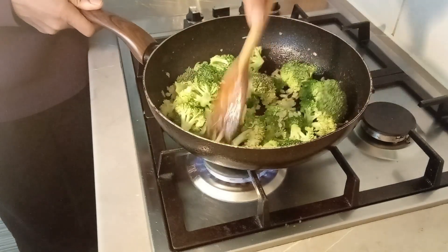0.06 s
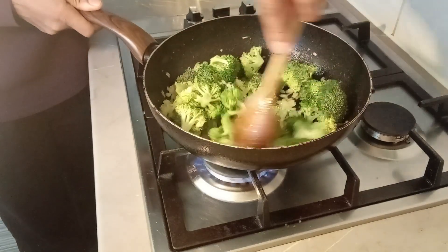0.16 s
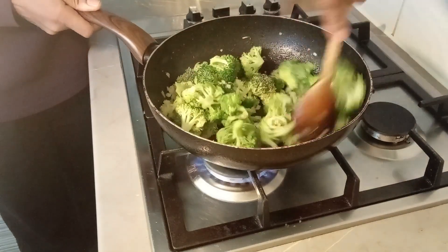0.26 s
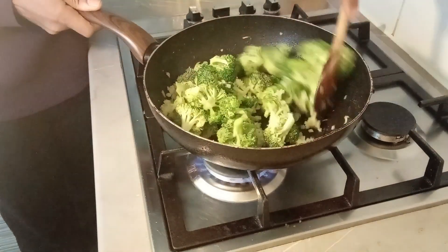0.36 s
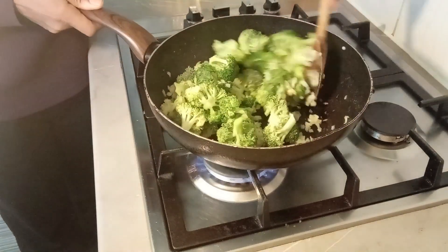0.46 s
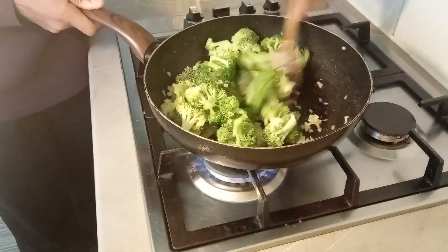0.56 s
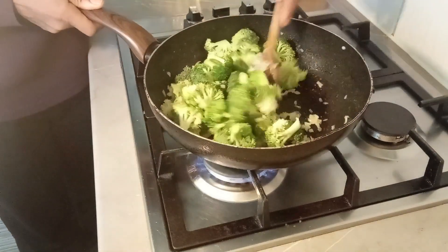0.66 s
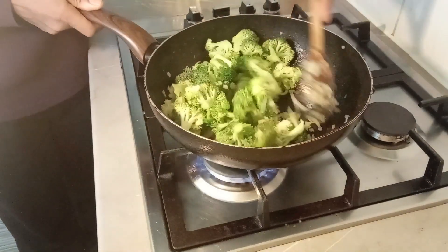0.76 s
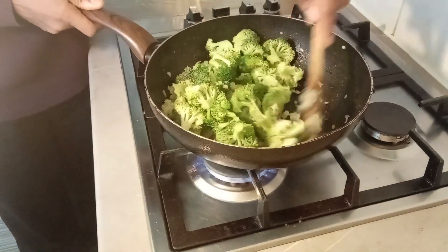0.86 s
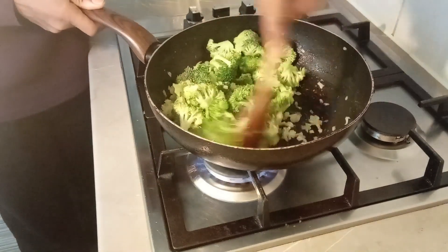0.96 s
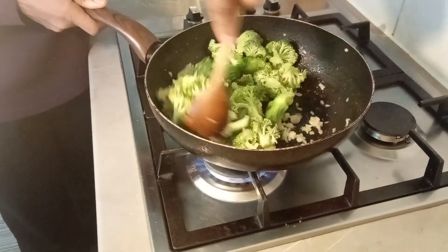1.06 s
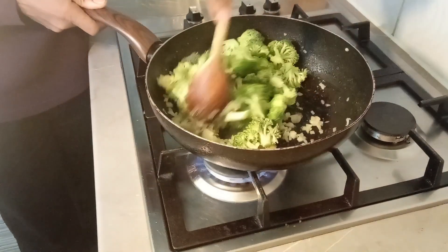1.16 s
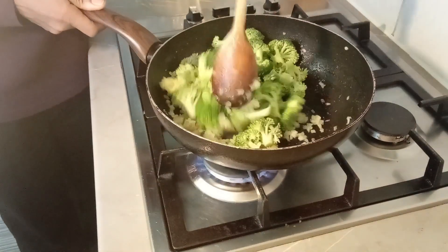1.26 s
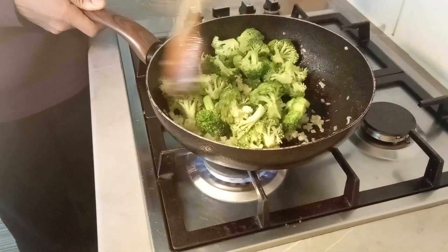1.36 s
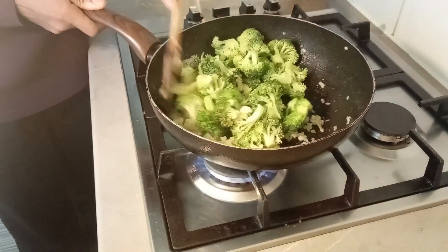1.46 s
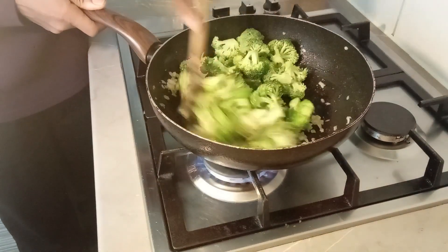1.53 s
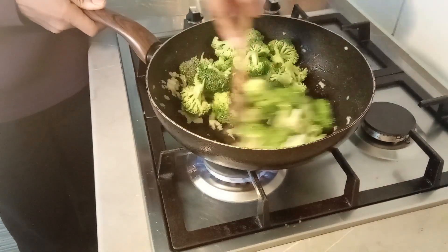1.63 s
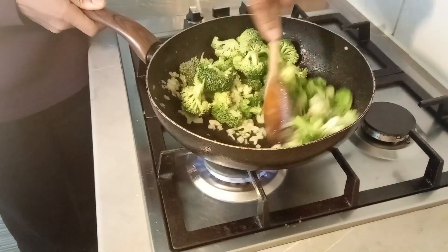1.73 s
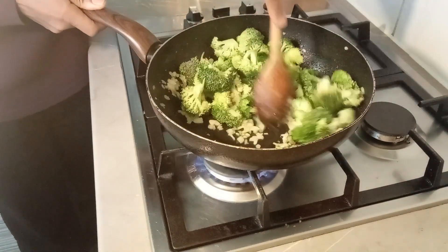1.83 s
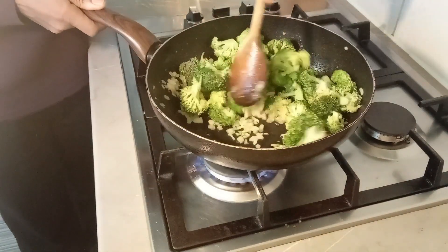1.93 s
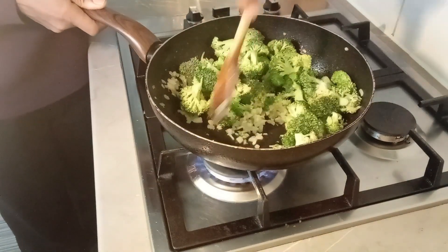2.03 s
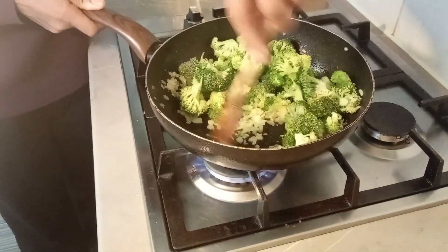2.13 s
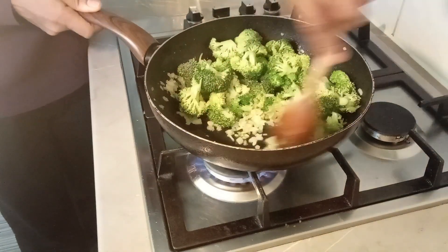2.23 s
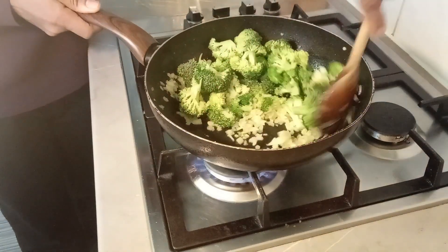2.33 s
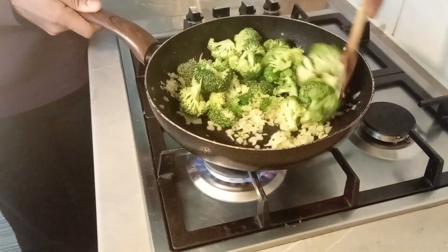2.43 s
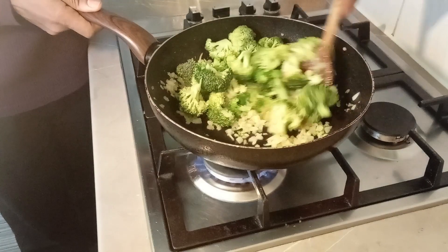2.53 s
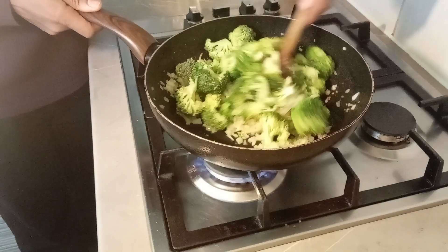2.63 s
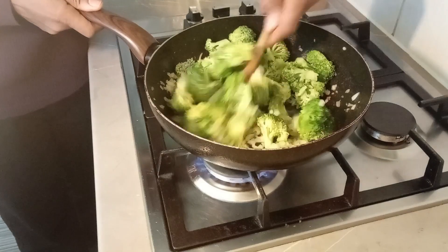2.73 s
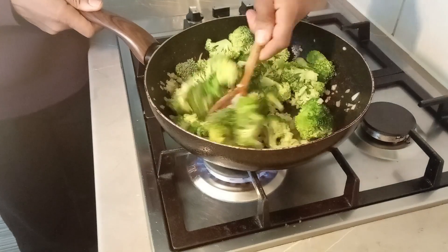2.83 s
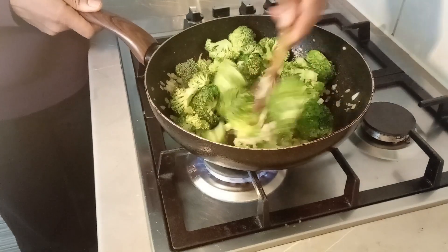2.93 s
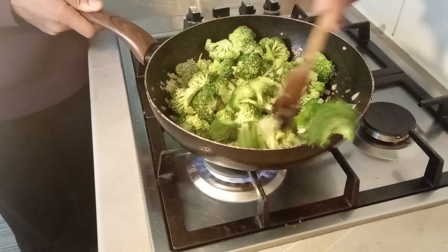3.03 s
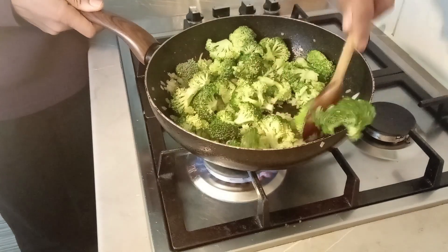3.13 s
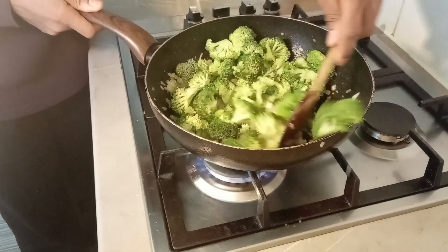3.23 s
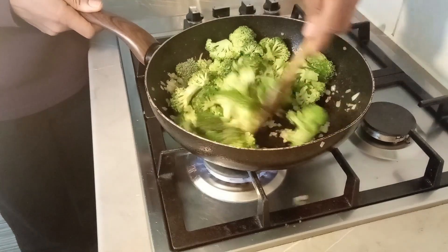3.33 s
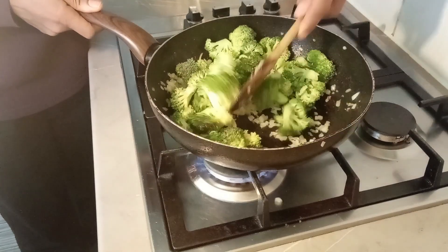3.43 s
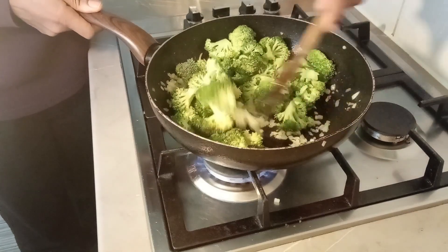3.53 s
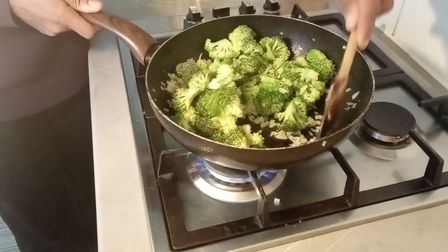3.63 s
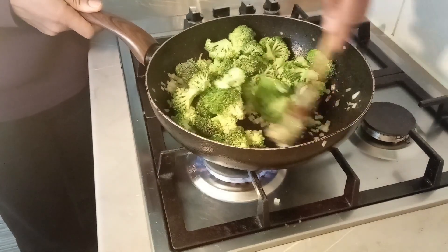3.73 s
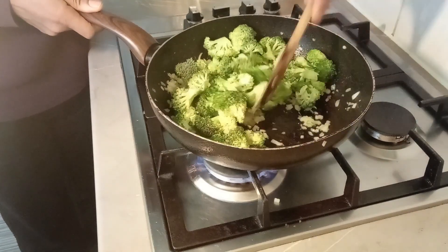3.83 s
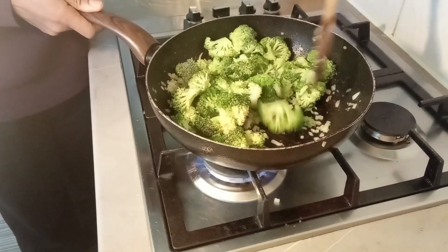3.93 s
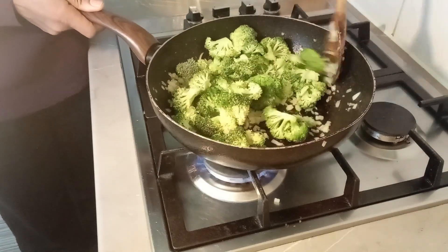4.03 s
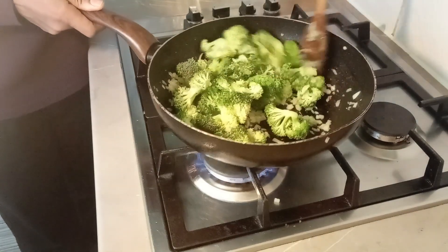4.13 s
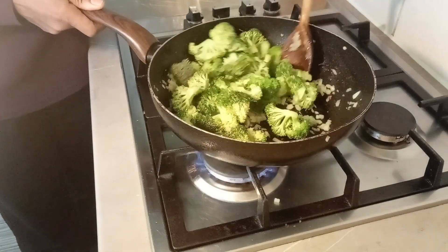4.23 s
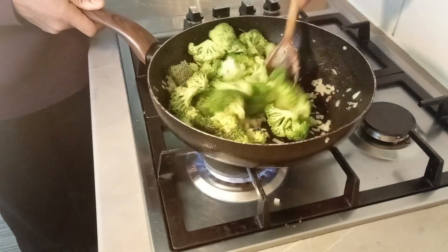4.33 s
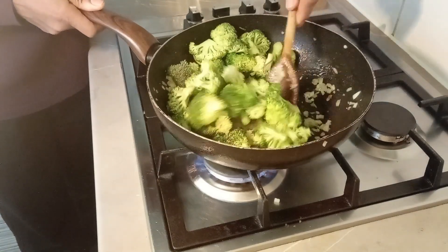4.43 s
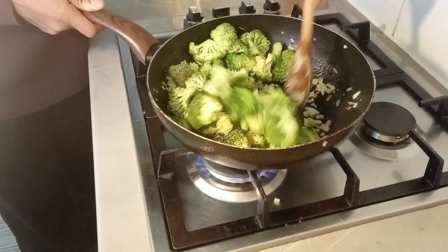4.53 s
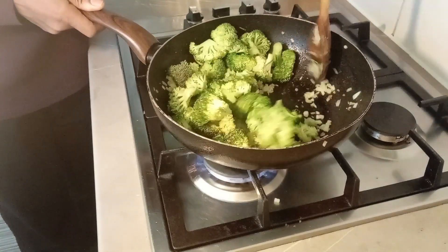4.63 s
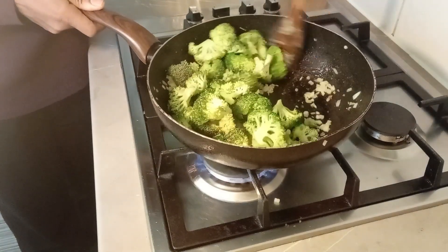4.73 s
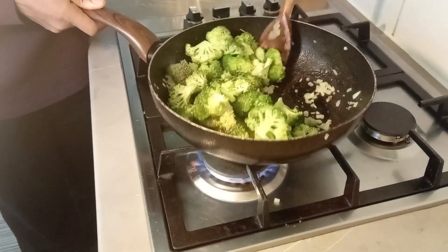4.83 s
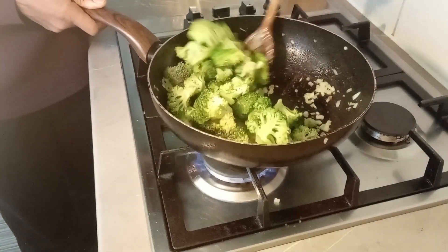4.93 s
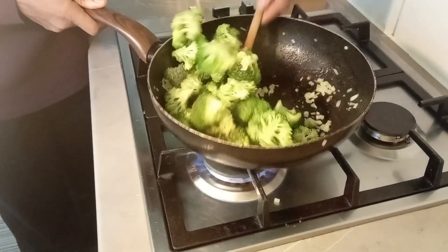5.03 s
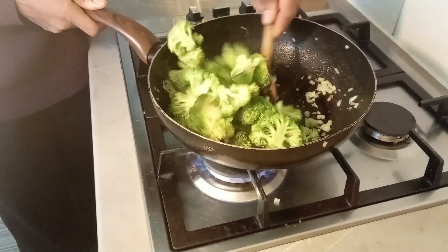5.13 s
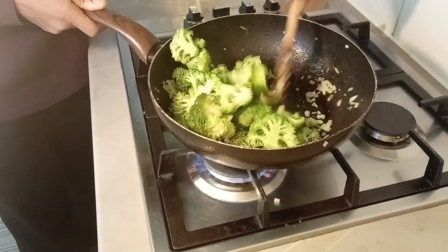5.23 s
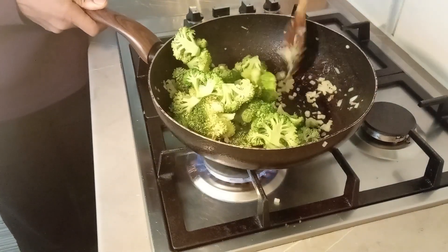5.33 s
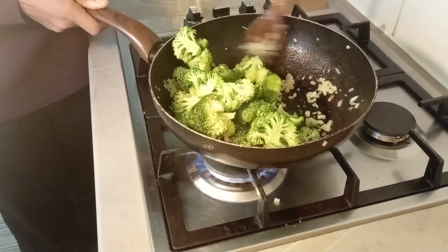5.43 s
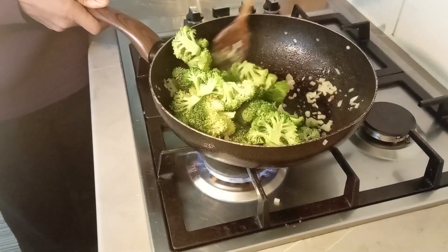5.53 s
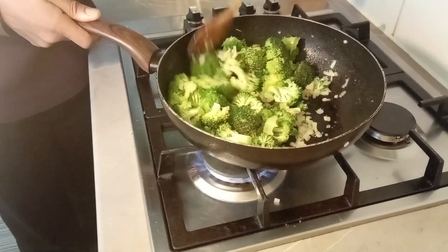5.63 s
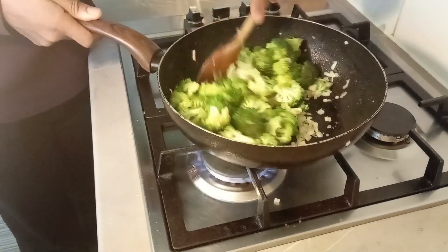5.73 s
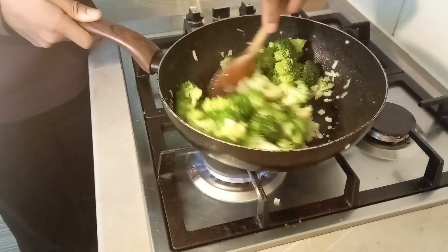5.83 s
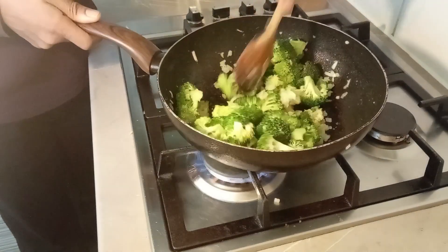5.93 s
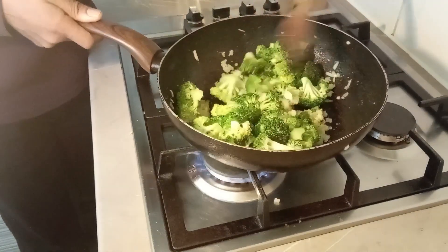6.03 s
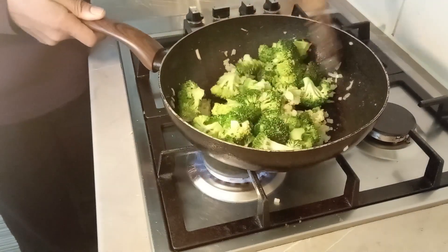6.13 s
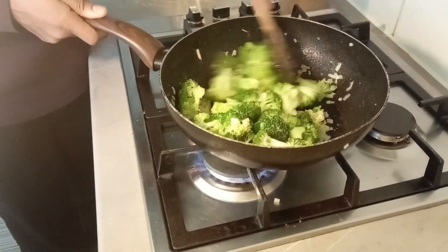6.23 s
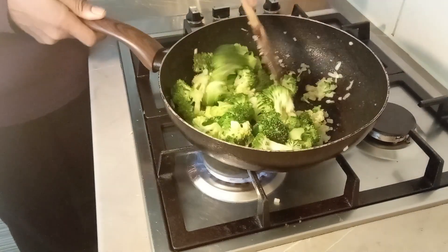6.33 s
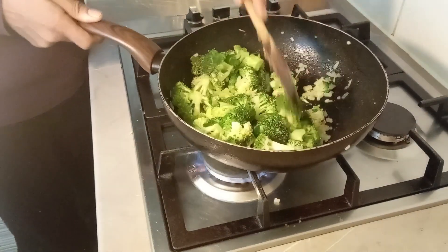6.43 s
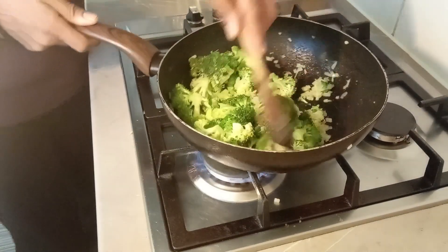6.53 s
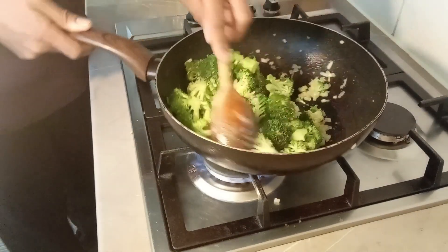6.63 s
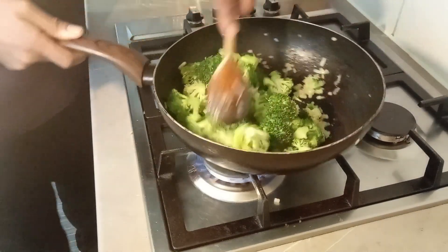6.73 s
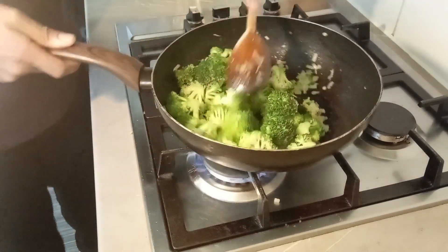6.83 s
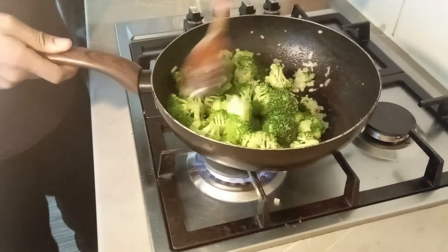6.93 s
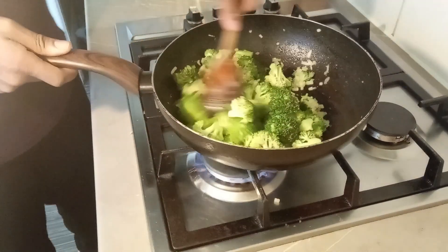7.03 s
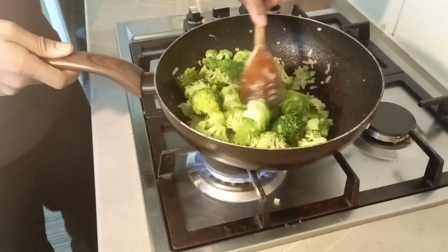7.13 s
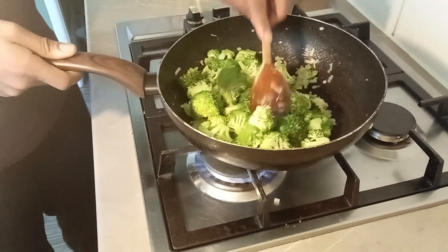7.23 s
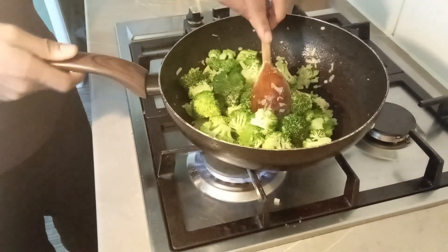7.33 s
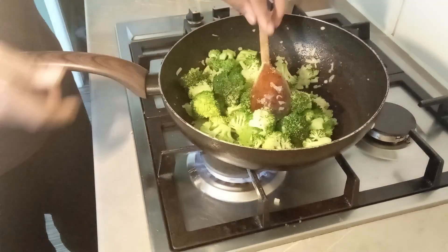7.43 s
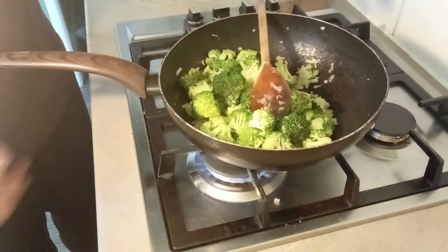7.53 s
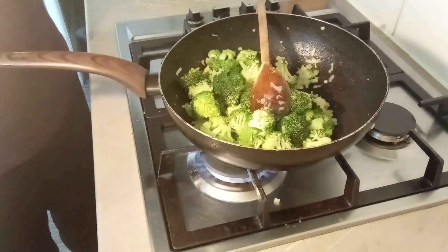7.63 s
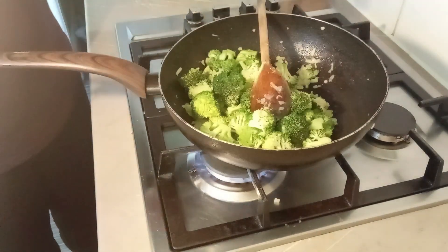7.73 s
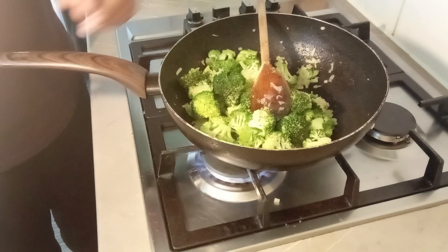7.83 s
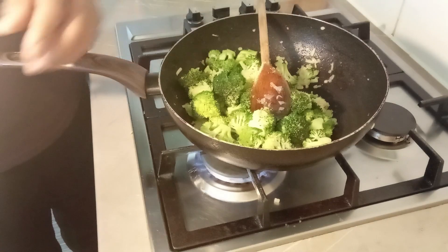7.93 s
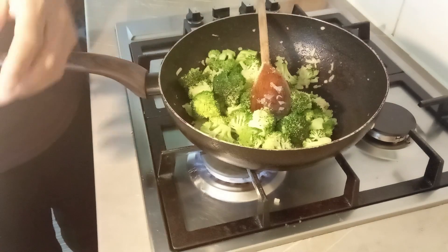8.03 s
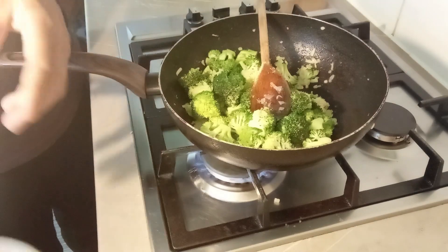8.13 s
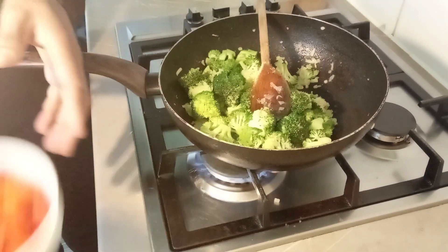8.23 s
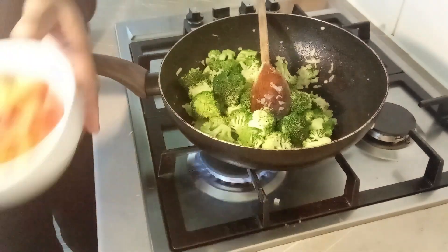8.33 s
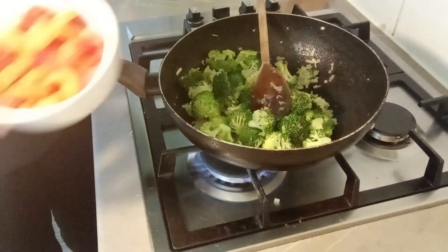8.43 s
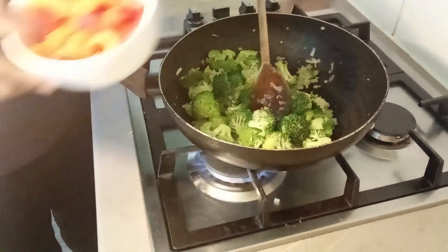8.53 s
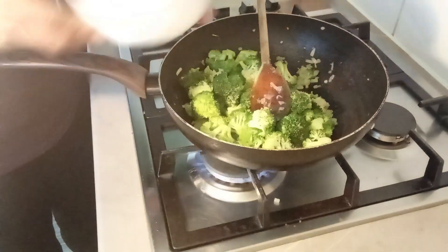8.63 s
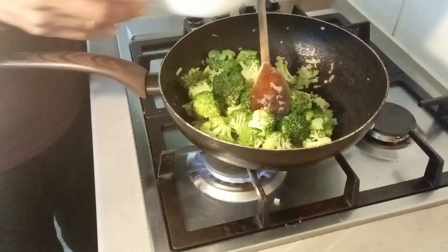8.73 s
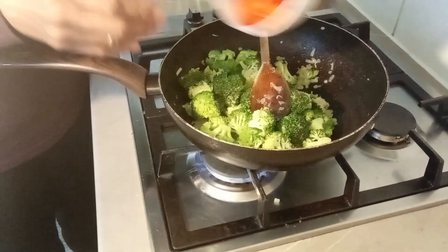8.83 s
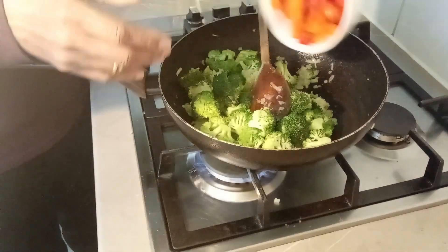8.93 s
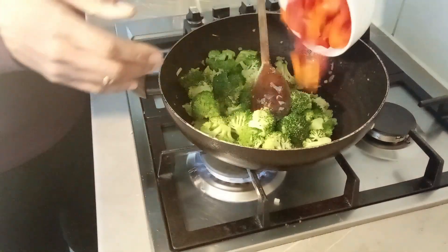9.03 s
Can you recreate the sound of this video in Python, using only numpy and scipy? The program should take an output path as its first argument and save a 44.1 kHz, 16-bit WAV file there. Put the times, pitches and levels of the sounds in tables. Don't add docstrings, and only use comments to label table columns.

```python
import sys
import numpy as np
from scipy import signal
from scipy.fft import rfft, irfft, next_fast_len
from scipy.io import wavfile
from scipy.ndimage import uniform_filter1d

SR = 44100
rng = np.random.default_rng(int(sys.argv[2]) if len(sys.argv) > 2 else 0)


def transcribe(signal):
    frames = np.atleast_2d(signal).T
    limited = np.clip(frames, -1, 1)
    pcm = np.round(limited * 32767).astype(np.int16)
    wavfile.write(sys.argv[1], SR, pcm)


def level_to_linear(level):
    exponent = np.asarray(level, float) / 20
    return 10 ** exponent


N = 400428

# (frequency [Hz], density [dB per Hz])
AIR_SPECTRUM = [(140, -45), (240, -13), (414, -3.5), (475, -10), (1060, -2.5), (1140, 1), (1340, -13),
                (1500, -12), (1950, -1), (3300, -120)]
AIR_DB = -55.5
KITCHEN_T60_S, WALL_CUT_HZ = 0.2, 6300

# (frequency [Hz], density [dB per Hz])
ROAR_SPECTRUM = [(15, -73), (25, -35.5), (65, -41), (82, 1), (101, -5), (115, -7), (130, -25), (183, -20),
                 (260, -37), (340, -67), (570, -120)]
DRONE_HZ, DRONE_WIDTH_HZ, ROAR_DB = 103.1, 9.1, -67
DRONE_DB, DRONE_WAVER_DB = -45, -0.5
DRONE_SHAKEN_DB, SHAKE_S = -9.5, 0.2
DRONE_LEFT_DB = -2

# (time [s], pitch [Hz], level [dB])
SQUEAK = [
    (2.945, 650, -58),
    (2.96, 527, -42),
    (2.985, 476, -45),
    (3.005, 520, -50),
    (3.02, 600, -45),
]

# (peak time [s], half length [s], pitch [Hz], level [dB])
RUBS = [
    (0.026, 0.048, 643, -40.5),
    (0.597, .03, 600, -40.5),
    (1.888, 0.048, 670, -51),
    (3.356, 0.034, 600, -33.5),
    (5.65, .04, 650, -46),
    (6.846, 0.041, 330, -47.5),
    (7.312, 0.027, 261, -29.5),
]
# (multiple of its pitch [1], level [dB])
RUB_PARTIALS = [(1, 0.5), (1.63, -12.5), (2.5, -8)]
RUB_WIDTH_HZ = 44

# (peak time [s], half length [s], rumble [dB], rasp [dB])
STROKES = [(0.0, 0.28, -42, -51), (0.335, 0.24, -37, -32.5), (0.568, 0.066, -49, -30.5),
           (1.266, 0.22, -59, -47), (1.622, 0.18, -31, -36.5), (1.74, 0.084, -33, -60),
           (2.25, .1, -28.5, -27.5), (2.477, 0.05, -45, -42), (2.64, 0.34, -40.5, -69),
           (2.908, 0.11, -46, -60), (3.29, .1, -48, -39), (4.2, 0.14, -46, -63), (4.5, 0.077, -37, -46),
           (4.739, 0.073, -19.5, -29.5), (4.892, 0.057, -30, -38), (5.17, 0.079, -20, -21),
           (5.46, .08, -28, -98), (5.69, 0.13, -40, -30.5), (5.82, .1, -46, -35), (6.11, .1, -43, -57),
           (6.461, .06, -28, -32.5), (6.612, 0.064, -22, -51), (6.72, 0.15, -46, -36.5),
           (7.29, 0.19, -59, -38), (7.47, 0.038, -23, -54)]
STROKE_FADE_DB, IDLE_DB = 19.5, -63.5
SPOON_DOWN_S = 7.8

# (time [s], peak [dB], hardness [octaves], thud into the grate [dB], weight [0-2])
KNOCKS = [(0.852, -26.5, 1, -73, 0.18), (1.42, -23.5, 1.266, -21.5, 1.03), (2.13, -20, 1.53, -20.5, 1.56),
          (2.613, -24, 2.04, -13, 1.72), (3.154, -25.5, 0.92, -21.5, 1.9), (3.659, -23, 0.93, -20.5, 1.55),
          (4.019, -17, 2.03, -31, 1.4), (4.455, -30, 1.04, -17, 1.67), (4.641, -28.5, 0.95, -29, 1.64),
          (4.833, -21, 0.86, -17, 2.2), (4.931, -38, 2.4, -37, 1.54), (5.077, -17.5, 2.02, -9.5, 1.66),
          (5.349, -27.5, 0.94, -32, 0.45), (5.62, -35, 2.5, -65, 1.32), (5.855, -24.5, 2.1, -16, 1.7),
          (6.325, -16.5, 1.94, -12.5, 1.76), (6.589, -25, 1.97, -26, 1.57),
          (7.283, -24.5, 0.34, -17.5, 0.55), (7.432, -19.5, 1.46, -33, 0.93), (8.754, -59, 1.74, -58, 0.21)]
# (time [s], peak [dB], hardness [octaves], thud [dB])
NUDGES = [(0.156, -36, 0.66, -25), (0.278, -61, 2.4, -32), (0.362, -43.5, 1.76, -26),
          (0.576, -38, 1.38, -34), (0.619, -52, 3.1, -33), (0.869, -39, 0.66, -21),
          (0.959, -38.5, 1.25, -37), (1.703, -47, 1.54, -33.5), (2.718, -70, 1.9, -31),
          (4.177, -33, 0.17, -34), (5.719, -31, 0.35, -26), (6.992, -43, 0.99, -35), (7.925, -49, 1.5, -53)]
NUDGE_WEIGHT = 1.43
THUD_HZ, BODY_HZ = 130, 330
SOFT_FALL_DB = 40
LIGHT_TILT_DB, EVEN_WEIGHT = 8.5, 1.328
TOCK_DB, TOCK_T60_S = 8, 0.027
TOCK_PITCH_SHARE = 0.918

# (time [s], peak [dB], extra tilt [dB per octave])
RIM_HITS = [
    (4.018, 3, 1.5),
    (7.432, -9, 5.5),
]
# (frequency [Hz], level [dB], t60 [s])
RIM_MODES = [(312, -7, .25), (338, -11, .2), (709, 0, .11), (1093, -6, .1), (1170, -12, .15),
             (1350, -14, .1), (1625, -13, .09), (1768, -12, .09), (1960, -14, .08), (2365, -11, .06),
             (2930, -14, .04), (3540, -14, .045), (4100, -13, .05), (5200, -16, .035), (6300, -15, .035)]
# (frequency [Hz], level [dB], t60 [s])
CLATTER = [(107, 4.5, 0.21), (258, -10.5, 0.24), (600, -4.5, 0.21), (1120, -8.5, 0.13), (2500, 3, 0.52)]
# (frequency [Hz], level [dB], t60 [s])
PAN_MODES = [(50.3, 1.5, 0.85), (119.4, 0, 0.44), (166.7, 4.5, 0.15), (224.3, -6.5, 0.13),
             (327.7, -1, 0.28), (367.3, -8, 0.27), (431.5, -16, 0.13), (501, -9.5, 0.22),
             (551.4, 2.5, 0.058), (617, -11, 0.17), (710, -3.5, 0.097), (824, -47, 0.057), (907, -18, 0.03),
             (1044, 3, 0.1), (1182, -33.5, 0.041), (1318, -0.5, 0.043), (1365, -5, 0.079)]

# (time [s], peak [dB])
POPS = [(0.3145, -15), (0.626, -17.5), (0.657, -21), (1.4, -19), (2.4179, -24), (2.5704, -15.5),
        (2.8442, -24), (4.0212, -6), (4.6343, -20), (4.9467, -21), (5.4187, -18), (5.7336, -19.5),
        (5.816, -16.5), (5.909, -18), (6.003, -20), (6.145, -19), (6.459, -26), (6.5342, -19),
        (6.7356, -20), (6.8137, -16), (6.8843, -17.5), (6.991, -6.5), (7.233, -19.5), (7.5394, -20),
        (7.6883, -19.5), (7.9947, -20.5), (8.4987, -23), (8.6482, -23), (8.7434, -16), (8.8154, -22)]
SPRAY_T60_S, SPRAY_GROWS = 0.084, 0.24
# (time [s], peak [dB], t60 [s])
CRACKS = [
    (1.4207, -15, 0.18),
    (2.8434, -25.5, 0.28),
    (3.6586, -21, 0.089),
    (4.0178, -4, 0.049),
    (5.4191, -27, 0.067),
    (5.7334, -21, 0.073),
    (6.8134, -18.5, 0.073),
    (6.99, -14, 0.054),
    (7.4325, 0, 0.077),
    (8.7424, -23.5, 0.15),
]

# (time [s], sizzle level [dB])
FRYING = [(0.0, -32), (0.48, -28.5), (0.66, -31.5), (1.11, -31), (1.9, -29.5), (2.71, -31), (4.32, -31),
          (4.5, -31), (5.66, -32), (5.89, -30.5), (6.65, -30), (6.85, -29.5), (8.24, -34), (8.72, -33),
          (9.08, -33.5)]
# (frequency [Hz], density [dB per Hz])
SIZZLE_SPECTRUM = [(880, -40), (1500, -8.5), (1800, -22.5), (2030, -20.5), (2350, -10.5), (2530, -9.5),
                   (3130, -0.5), (3760, -1), (4910, -0.5), (7030, 2.5), (7780, 0), (9010, -0.5),
                   (13500, -14.5)]
# (frequency [Hz], density [dB per Hz])
COARSE_SPECTRUM = [(410, -24), (700, -7), (805, -57), (1380, -3.5), (2360, -1.5), (2530, 0.5), (3200, -10),
                   (4160, -8), (7040, -120)]
FINE_FOLLOWS = 0.23
WET_DB, WET_FOLLOWS = -46.5, 1.6
WET_STIRRED_DB = -9.5

# (frequency [Hz], gain [dB])
MICROPHONE = [(30, -18), (50, -24.5), (90, -0.5), (5700, 1.5), (6600, 4), (7500, -1.5), (13400, -4),
              (14000, 2), (14600, 3), (15600, 22), (15750, -56)]


def rms_one(x):
    return x / np.sqrt(np.mean(x ** 2) + 1e-20)


def in_time(rows):
    s, *columns = np.transpose(rows)
    return [np.interp(np.arange(N) / SR, s, c) for c in columns]


def colour(x, spectrum):
    size = next_fast_len(N)
    hz = np.maximum(np.fft.rfftfreq(size, 1 / SR), 1)
    table = np.array(spectrum)
    gain_db = np.interp(np.log(hz), np.log(table[:, 0]), table[:, 1])
    return irfft(rfft(x, size) * level_to_linear(gain_db), size)[:N]


def band_pass(x, low_hz, high_hz, order):
    return signal.sosfilt(signal.butter(order, [low_hz, high_hz], "band", fs=SR, output="sos"), x)


def drift(rate):
    r = np.exp(-80 * np.pi * rate / SR)
    white = rng.standard_normal(N // 40 + 2002)
    slow = signal.lfilter([1], [1, -2 * r, r * r], white)[2000:]
    return np.interp(np.arange(N) / 40, np.arange(len(slow)), rms_one(slow))


def ring(clicks, hz, t60):
    r = np.exp(-np.log(1000) / (t60 * SR))
    w = 2 * np.pi * hz / SR
    return signal.lfilter([0, np.sin(w)], [1, -2 * r * np.cos(w), r * r], clicks + 1e-18)


def grains(per_s, spread_db):
    sizes = level_to_linear(spread_db * np.minimum(rng.exponential(1, N), 6))
    sizes = sizes * rng.choice([-1, 1], N)
    return rms_one(sizes * (rng.random(N) < per_s / SR))


def air():
    return level_to_linear(AIR_DB - 5.0) * rms_one(colour(rng.standard_normal(N), AIR_SPECTRUM))


def kitchen(x):
    size = next_fast_len(N + SR)
    w = 2 * np.pi * np.fft.rfftfreq(size)
    wall = 1 / (1 + 1j * w * SR / (2 * np.pi * WALL_CUT_HZ))
    answer = 0
    for k, lag in enumerate(np.round(rng.uniform(.006, 0.033, size=8) * SR)):
        loop = np.exp(-np.log(1000) * lag / SR / KITCHEN_T60_S - 1j * w * lag) * wall
        answer = answer + (-1) ** k * loop / (1 - loop)
    return irfft(rfft(x, size) * answer, size)[:N]


def stirring():
    t = np.arange(N) / SR
    out = np.full((2, N), float(IDLE_DB))
    for s, half_s, *db in STROKES:
        stroke = np.array(db)[:, None] - STROKE_FADE_DB * np.abs(t - s) / half_s
        out = np.maximum(out, stroke)
    return np.where(t < SPOON_DOWN_S, out, -120)


def burner():
    calm = level_to_linear(DRONE_DB + DRONE_LEFT_DB * (np.arange(N) > SPOON_DOWN_S * SR))
    shaken = uniform_filter1d(level_to_linear(stirring()[0] + DRONE_SHAKEN_DB), round(SHAKE_S * SR))
    t60 = np.log(1000) / (np.pi * DRONE_WIDTH_HZ)
    drone = rms_one(ring(rng.standard_normal(N), DRONE_HZ, t60))
    steady = np.sin(2 * np.pi * DRONE_HZ * np.arange(N) / SR)
    roar = rms_one(colour(rng.standard_normal(N), ROAR_SPECTRUM))
    waver = level_to_linear(4.5 + DRONE_WAVER_DB * drift(1.7))
    return waver * (calm + shaken) * (drone + 0.27 * steady) + level_to_linear(ROAR_DB) * roar


def squeak():
    hz, db = in_time(SQUEAK)
    t = np.arange(N) / SR
    sounding = (t > SQUEAK[0][0]) & (t < SQUEAK[-1][0])
    return sounding * level_to_linear(db - 5) * np.sin(2 * np.pi * np.cumsum(hz) / SR)


def rubs():
    out = np.zeros(N)
    noise = rng.standard_normal((len(RUBS), len(RUB_PARTIALS), SR // 2))
    t60 = np.log(1000) / (np.pi * RUB_WIDTH_HZ)
    for (s, half_s, hz, db), rows in zip(RUBS, noise):
        at = np.arange(SR // 2) + round(s * SR) - SR // 4
        swell = level_to_linear(db) * np.exp(-((at / SR - s) / half_s) ** 2)
        tone = 0
        for (multiple, level_db), row in zip(RUB_PARTIALS, rows):
            tone = tone + level_to_linear(level_db) * rms_one(ring(row, multiple * hz, t60))
        out[at[at >= 0]] += (swell * tone)[at >= 0]
    return out


def touches():
    return sorted(KNOCKS + [(*row, NUDGE_WEIGHT) for row in NUDGES])


def knock_db(hz):
    s, db, hard, thud_db, weight = np.transpose(touches())
    octave = np.log2(hz / BODY_HZ)
    if octave < 0:
        return db + (thud_db - db) * min(octave / np.log2(THUD_HZ / BODY_HZ), 1)
    tilt_db = LIGHT_TILT_DB * (EVEN_WEIGHT - weight)
    return db + tilt_db * np.minimum(octave, hard) - SOFT_FALL_DB * np.maximum(octave - hard, 0)


def tock():
    t = np.arange(SR // 8) / SR
    out = np.zeros(N + len(t))
    for s, db, hard, thud_db, weight in touches():
        hz = TOCK_PITCH_SHARE * BODY_HZ * 2 ** min(hard, 2)
        level_db = db + LIGHT_TILT_DB * (EVEN_WEIGHT - weight) * min(hard, 2) + TOCK_DB
        note = np.sin(2 * np.pi * hz * t) * np.minimum(t * hz, 1)
        i = round(s * SR)
        out[i:i + len(t)] += level_to_linear(level_db - 60 * t / TOCK_T60_S) * note
    return out[:N]


def rim():
    out = np.zeros(N)
    luck = rng.standard_normal((len(RIM_HITS), len(RIM_MODES)))
    for (hz, db, t60), chance in zip(RIM_MODES, luck.T):
        clicks = np.zeros(N)
        for (s, peak_db, tilt_db), c in zip(RIM_HITS, chance):
            strength = level_to_linear(peak_db + db - 13.0 + tilt_db * np.log2(hz / 700) + 2.1 * c)
            clicks[round(s * SR)] = strength
            clicks[round((s + .0035) * SR)] = 0.11 * strength
        out += ring(clicks, hz, t60)
    return signal.sosfilt(signal.butter(2, 7000, fs=SR, output="sos"), out)


def clatter():
    t = np.arange(SR // 3) / SR
    hz_table, db_table, t60_table = np.transpose(CLATTER)
    edges = 140 * 2 ** np.arange(0, 4.5, .5)
    white = rng.standard_normal((2, N)) * level_to_linear(1.9 * drift(43))
    drag = level_to_linear(stirring()[1] - 28.0)
    out = np.zeros(N)
    for k, (low, high) in enumerate(zip(edges, edges[1:])):
        hz = np.sqrt(low * high)
        db = np.interp(np.log(hz), np.log(hz_table), db_table)
        t60 = np.interp(np.log(hz), np.log(hz_table), t60_table)
        rise = np.minimum(t / (0.0025 + .5 / hz), 1)
        crack = 0.43 * np.exp(-t / 0.00096)
        envelope = np.zeros(N + len(t))
        for row, level_db in zip(touches(), knock_db(hz)):
            i = round(row[0] * SR)
            fall = np.exp(-np.log(1000) * t / (t60 * np.clip(row[4], .2, 3))) + crack
            envelope[i:i + len(t)] += level_to_linear(level_db + db - 1.5) * rise * fall
        if 250 < hz < 900:
            envelope[:N] += drag
        out += rms_one(band_pass(white[k % 2], low, high, order=2)) * envelope[:N]
    return out


def pan():
    t = np.arange(SR // 16) / SR
    rough = rng.standard_normal((len(touches()), len(t) + len(PAN_MODES) * 50))
    push = t * np.exp(-t / 0.0036)
    push /= np.sum(push) / 2
    luck = rng.standard_normal((len(touches()), len(PAN_MODES)))
    rumble_db, rasp_db = stirring()
    slips = grains(900, 2.6) * level_to_linear(3.6 * drift(17))
    rumble = slips * level_to_linear(rumble_db - 37)
    rasp = slips * level_to_linear(rasp_db - 38.5)
    out = np.zeros(N)
    for k, (hz, db, t60) in enumerate(PAN_MODES):
        force = np.zeros(N + len(t))
        swing = np.cos(2 * np.pi * hz * t)
        for row, level_db, noise, c in zip(touches(), knock_db(hz), rough, luck[:, k]):
            i = round(row[0] * SR)
            uneven = swing + 6.6 * noise[k * 50:k * 50 + len(t)]
            force[i:i + len(t)] += level_to_linear(level_db - 1.0 + 3.16 * c) * push * uneven
        if hz < 1000:
            force[:N] += rumble if hz < 260 else rasp
        out += level_to_linear(db) * ring(force[:N], hz, t60)
    return out


def bursts(rows, crack_s, spray_share):
    t = np.arange(SR // 4) / SR
    out = np.zeros(N)
    sprays = rng.standard_normal((len(rows), len(t)))
    sprays[:, :2] = [2.5, -2.5]
    for (s, db, t60), spray in zip(rows, sprays):
        at = round(s * SR)
        burst = spray * (np.exp(-t / crack_s) + spray_share * np.exp(-np.log(1000) * t / t60))
        out[at:at + len(t)] += level_to_linear(db) * burst[:N - at]
    return out


def pops():
    rows = [(s, db, SPRAY_T60_S * level_to_linear(SPRAY_GROWS * (db + 15))) for s, db in POPS]
    spits = bursts(rows, crack_s=0.00057, spray_share=0.36)
    full = band_pass(bursts(CRACKS, crack_s=0.0072, spray_share=0.46), 1100, 2400, order=2)
    fine = band_pass(np.tanh(spits / .2) * 0.18, 9000, 14000, order=2)
    bright = band_pass(spits, 2720, 8750, order=3)
    return level_to_linear(2.0) * bright + level_to_linear(-7.5) * fine + level_to_linear(-2.5) * full


def fizz(spectrum, per_s, spread_db, surge_db, patchy_db, count):
    surge = surge_db * (drift(7.3) + 1.63 * drift(45))
    wide = grains(per_s, spread_db)
    edges = spectrum[1][0] * 2 ** (np.arange(count + 1) * .7 - .7)
    out = np.zeros(N)
    for k, (low, high) in enumerate(zip(edges, edges[1:])):
        sized = np.roll(wide, (k + 1) * SR)
        band = band_pass(0.5 * wide + sized, low, high, order=2)
        out += band * level_to_linear(surge + patchy_db * drift(5.4))
    return rms_one(colour(out, spectrum))


def sizzle():
    (sizzle_db,) = in_time(FRYING)
    swing_db = sizzle_db - sizzle_db.mean()
    hiss = fizz(SIZZLE_SPECTRUM, 14000, spread_db=2.5, surge_db=0.61, patchy_db=-0.2, count=6)
    top = signal.sosfilt(signal.butter(4, 10000, "high", fs=SR, output="sos"), hiss)
    hiss = hiss + top * (level_to_linear(FINE_FOLLOWS * swing_db) - 1)
    coarse = fizz(COARSE_SPECTRUM, 5000, spread_db=0.5, surge_db=1.33, patchy_db=-0.05, count=5)
    stirred = level_to_linear(stirring()[1] + WET_STIRRED_DB - 16.5)
    wet = level_to_linear(WET_DB + WET_FOLLOWS * swing_db) + stirred
    return level_to_linear(sizzle_db - 2.0) * hiss + wet * coarse


def scene():
    hits = pan() + clatter() + rim() + tock()
    spits = pops()
    echoes = kitchen(level_to_linear(-15.5) * hits + level_to_linear(-13.5) * spits)
    mix = hits + spits + echoes + sizzle() + burner() + air() + squeak() + rubs()
    return np.stack([mix, mix])


def top_cut(x):
    return signal.sosfilt(signal.butter(12, 17100, fs=SR, output="sos"), x)


def record(dry):
    x = 1.008 * colour(dry[0], MICROPHONE)
    x = x / (1 + x ** 4) ** .25
    x = signal.sosfilt(signal.cheby2(12, 60, 16200, fs=SR, output="sos"), 1.06 * x)
    return top_cut(np.stack([x, x]))


dry = scene()
out = record(dry)
transcribe(out)
```